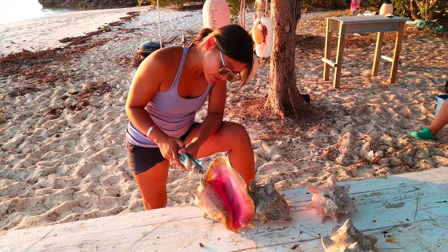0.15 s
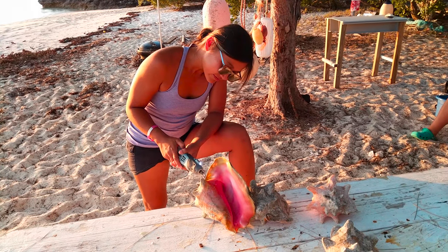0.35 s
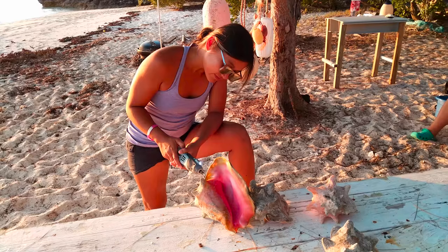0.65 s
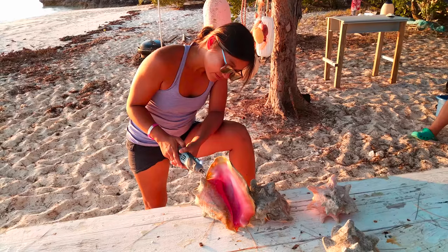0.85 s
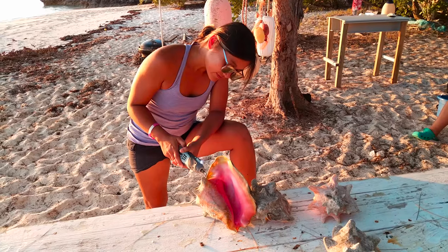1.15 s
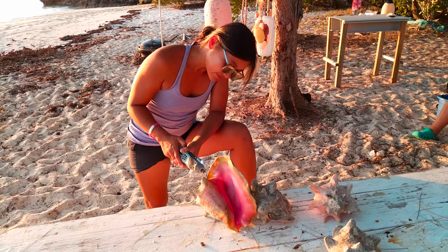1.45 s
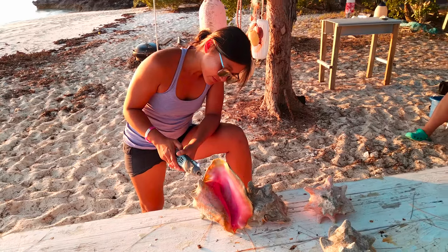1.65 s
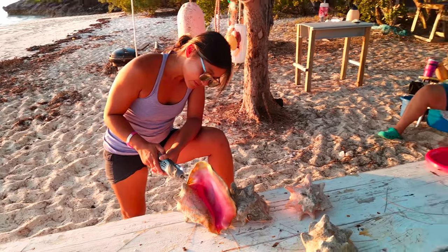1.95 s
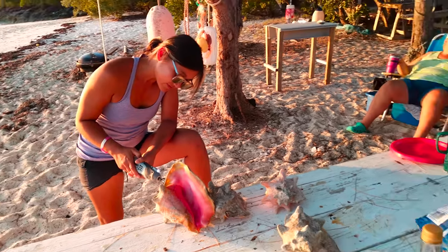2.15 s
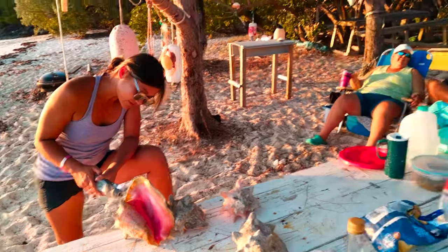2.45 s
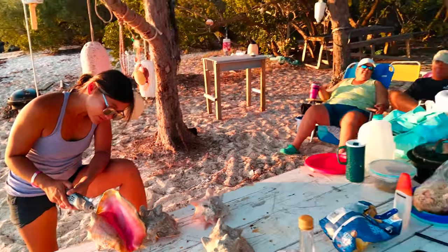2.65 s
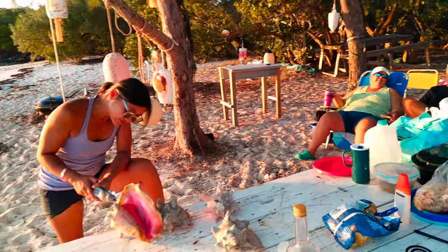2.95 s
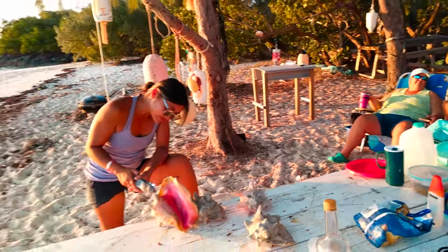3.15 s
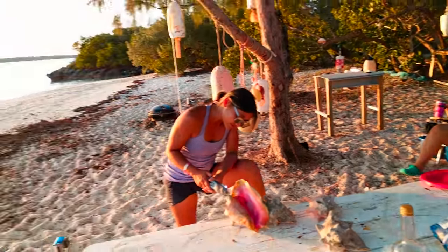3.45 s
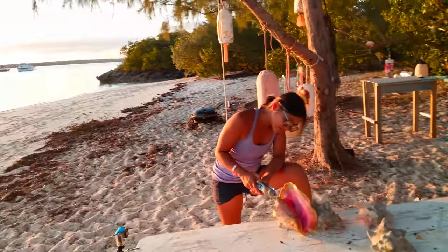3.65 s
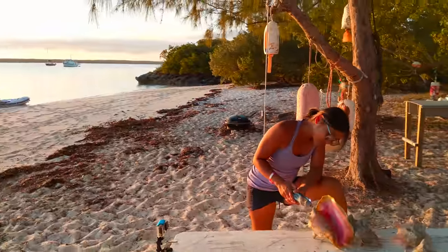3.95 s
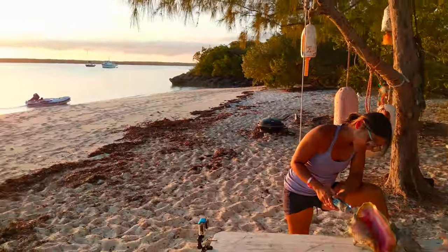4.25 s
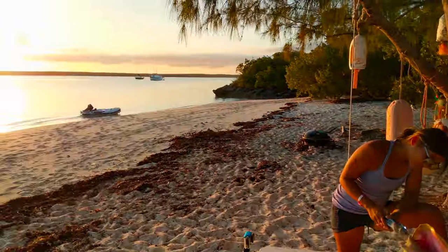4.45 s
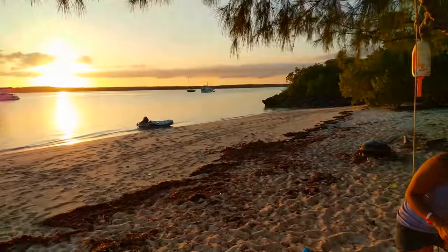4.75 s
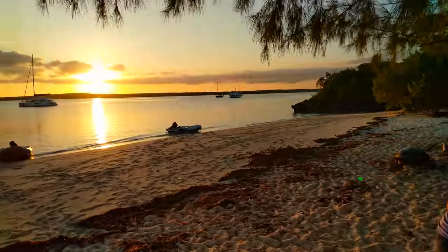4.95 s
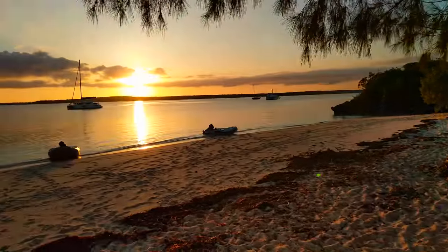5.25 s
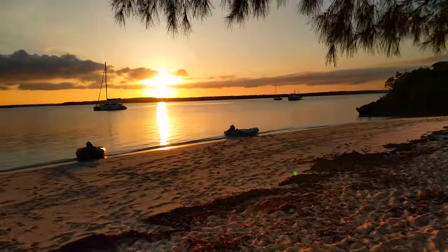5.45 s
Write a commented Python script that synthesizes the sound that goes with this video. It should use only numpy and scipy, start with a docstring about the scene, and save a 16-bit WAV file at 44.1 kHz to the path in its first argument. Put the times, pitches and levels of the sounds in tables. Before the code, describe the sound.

On a calm beach, a small rotary tool grinds a hard shell close to the microphone without a pause. A high motor whine mixes with hiss and rasp, and shrill squeals come and go as the bit bites. The shell flutters twice under the skipping bit. Later the pitch lifts slightly and the hiss changes colour as the microphone swings away, with a faint low rumble of breeze.

```python
"""A steady whine fades in close by: a handheld rotary tool, turning about 450 times a second, grinds a
conch shell on a table at a calm beach. The whine changes colour as the bit seats itself, skips or catches
and squeals; grit hisses, rasps once a turn and makes the shell ring. The microphone swings aside and
turns away, so the dips that a reflection cuts into the hiss slide upward. Light air rumbles below."""
import sys
import numpy as np
from scipy import signal
from scipy.io import wavfile
from scipy.ndimage import map_coordinates

SR = 44100
rng = np.random.default_rng(int(sys.argv[2]) if len(sys.argv) > 2 else 0)


def inscribe(sig):
    """Save sig as 16-bit PCM at rate SR to the path in sys.argv[1].

    A 1-D sig is mono; a 2-D sig holds one channel per row.
    Samples are clipped to [-1, 1] before scaling.
    """
    pcm = np.round(np.clip(np.atleast_2d(sig).T, -1, 1) * 32767)
    wavfile.write(sys.argv[1], SR, pcm.astype(np.int16))


N = 247665
TIME = np.arange(N) / SR

# spindle speed: (time [s], speed [turns/s])
SPINDLE_SPEED = [(0.0, 451.66), (0.5, 450.29), (0.72, 453.01), (0.88, 452.93), (1.07, 450.95),
                 (1.3, 450.34), (1.63, 447.4), (1.97, 451.31), (2.6, 450.56), (3.2, 449.12), (3.52, 452.15),
                 (3.78, 458.57), (4.05, 462.35), (4.17, 460.46), (4.45, 461.31), (4.7, 464.59),
                 (4.95, 462.16), (5.62, 462.68)]
# the bit sits in the cut; otherwise it skips: (start [s], end [s], firmness [0-1])
BIT_SEATS = [(0.518, .93, 0.95), (1.613, 2.963, 0.85), (3.544, 4.12, 0.7), (4.147, 5.7, 0.97)]
# the microphone's path: (time [s], to the side [0-1], turned away [0-1], reflection strength [factor],
# first dip [Hz], second dip [Hz], third dip [Hz])
MIC_PATH = [(0, 0.03, 0.04, 1.05, 3090, 7370, 11200), (1.9, 0, 0, 0.8, 3160, 7200, 11300),
            (2.45, 0.8, 0.1, 0.9, 3070, 6400, 10800), (2.95, 1, 0.2, 1.15, 2940, 6530, 11200),
            (3.3, 0.65, .2, 0.97, 3220, 7100, 11700), (3.55, 0.43, 0.5, 1.8, 3600, 7840, 11500),
            (3.78, 0.4, 0.38, 1.24, 3950, 9100, 13400), (4.2, 0.2, 0.44, 0.83, 4220, 8700, 14800),
            (4.7, 0.28, 0.8, 1, 4130, 9400, 17000), (5.05, 0.04, 0.8, 0.62, 4160, 12500, 18000),
            (5.62, 0.15, 1, 0.57, 4260, 14200, 18000)]
# dips cut by a reflection of strength 1: (half width [share of centre], depth [dB])
REFLECTION_DIPS = [(0.11, -11.5), (0.11, -5.5), (0.1, -4.5)]
# tones of bit and motor: (multiple [x speed], roughness [0-1], then five levels: skipping [dB],
# seated [dB], side change skipping [dB], side change seated [dB], change turned away [dB])
WHINE_TONES = [(2, .09, -48.5, -41.3, -14.5, -2.5, 1), (3, 0.14, -45, -53.5, -3, 12.5, -4.5),
               (4, 0, -42.5, -43.5, 0.5, -4.5, -6), (5, 0, -59.5, -44, -7, -2, -5),
               (6, 0.08, -45.5, -44.5, -9.5, -10, 0.5), (12, 0.17, -48, -42, -2.5, 1.5, -5)]
# the grinding noises, each with the same five levels [dB]
HISS_LEVELS = (-39, -39.5, -0.5, -0.05, -1.95)
LOW_RASP_LEVELS = (-54, -58, 1.5, 7, -2.5)
HIGH_RASP_LEVELS = (-47, -48, -6.5, -4, -13)
SHELL_LEVELS = (-43, -43, 3, 2, -30)
# resonances under the bit: (centre [Hz], width of each filter pass [Hz], trim [dB])
LOW_RASP_MODE, HIGH_RASP_MODE, SHELL_MODE = (732, 360, 0), (1870, 1050, 1.33), (4980, 380, -2.5)
# the shell's own notch, heard from the front: (centre [Hz], half width [Hz], depth [dB])
SHELL_NOTCH = (5530, 57, -4)
# upper harmonics, microphone in front and turned away: (frequency [Hz], level [dB])
OVERTONES_ON_AXIS = [(3150, -60.5), (4050, -56.5), (5000, -58.5), (6300, -57.5), (7400, -53.5), (8500, -64),
                     (10400, -58), (12500, -56.5), (14000, -56)]
OVERTONES_OFF_AXIS = [(3200, -70), (3700, -48.5), (4200, -51), (5100, -50.5), (6300, -56), (7400, -54),
                      (9500, -62.5), (11300, -58.5), (14000, -58)]
# tones between the harmonics: (multiple [x speed], seated [dB], skipping [dB], change turned away [dB])
RATTLE_TONES = [(.5, -85, -70, -13), (1.133, -57, -67, -16), (1.495, -61, -55, -10), (2.495, -88, -64, -3),
                (3.556, -55.5, -54.5, -1), (4.13, -57, -56, -13), (4.52, -53, -58, -18)]
# hiss of grit and cooling air, in front and turned away: (frequency [Hz], relative level [dB])
HISS_ON_AXIS = [(120, -18), (330, -14), (480, -9), (720, -7.5), (1150, -2), (2600, -0.5), (3600, -4),
                (4600, 1.5), (5700, -1), (8300, -3.5), (9800, -1.5), (11800, -1), (13500, 2), (14300, 2)]
HISS_OFF_AXIS = [(120, -13), (330, -10.5), (480, -12), (720, -4), (1150, -5.5), (1950, -4.5), (2550, 4.5),
                 (3500, 0.5), (5200, 1.5), (7400, 0.5), (9000, -0.5), (10400, -0.5), (12200, -1),
                 (13500, 4.5), (14300, -8)]
# hum of the unbalanced spindle: (time [s], level before trim [dB])
SPINDLE_HUM = [(0.0, -79), (0.03, -66), (0.36, -55), (2.24, -52), (2.8, -49), (3.69, -65.5), (3.79, -58),
               (5.4, -53.5), (5.62, -55)]
# gusts on the microphone: (time [s], level [dB])
MIC_GUSTS = [(2.3, -71), (2.53, -63), (3.06, -69), (4.15, -55), (4.32, -66), (5.22, -63.5), (5.47, -64)]
# the bit catches and sings: (start [s], end [s], multiple [x speed], level [dB])
BIT_SQUEALS = [(.15, .63, 31, -46), (0.878, 1.32, 22, -47.5), (1.03, 1.82, 31, -49), (1.64, 1.924, 22, -45),
               (1.95, 2.32, 30, -50), (2.34, 2.95, 30, -47), (2.42, 2.63, 29, -43),
               (2.462, 2.724, 23, -48.5), (3.172, 3.46, 31, -49), (3.42, 3.75, 21, -51.5),
               (3.472, 3.702, 23, -49.5), (3.757, 4.033, 22, -45), (3.993, 4.17, 23, -42),
               (4.3, 4.42, 26, -41), (4.38, 4.913, 29, -44), (4.818, 5.7, 23, -49), (5.065, 5.7, 18, -46),
               (5.104, 5.55, 27, -49.5), (5.3, 5.7, 21, -50)]
# the skipping bit makes the shell chatter: (start [s], end [s], level [dB])
SHELL_CHATTERS = [(1.13, 1.6, -44), (3.03, 3.27, -48)]


def from_db(db):
    """Decibels to gain."""
    return np.exp(np.asarray(db) * (np.log(10) / 20))


def rms_one(x):
    """Scale to rms 1."""
    return x / np.sqrt(np.mean(x ** 2) + 1e-20)


def in_time(rows, times=TIME):
    """Each column of a curve table at the given times."""
    row_times, *columns = np.transpose(rows)
    return [np.interp(times, row_times, column) for column in columns]


def at_hz(points, hz):
    """Read a spectrum on a log-frequency axis."""
    point_hz, level_db = np.transpose(points)
    return np.interp(np.log(np.maximum(hz, 1)), np.log(point_hz), level_db)


def bell_db(hz, centre_hz, width_hz, height_db):
    """A rounded peak or notch."""
    return height_db * np.exp(-((hz - centre_hz) / width_hz) ** 2)


def held(times, start, end, edge_s):
    """An envelope held from start to end with rounded edges, 0-1."""
    inside_s = np.minimum(times - start, end - times)
    return np.sin(np.pi / 2 * np.clip(inside_s / edge_s + .5, 0, 1)) ** 2


def drift(rate_hz, size=N, step=40, run_in=2000):
    """Smooth random motion of spread 1, drawn every few samples and joined by straight lines."""
    pole = np.exp(-2 * np.pi * rate_hz * step / SR)
    noise = rng.standard_normal(N // step + run_in + 2)
    slow = rms_one(signal.lfilter([1], [1, -2 * pole, pole ** 2], noise)[run_in:])
    return np.interp(np.arange(size) / step, np.arange(len(slow)), slow)


def resonate(x, hz, width_hz):
    """One resonance; rms 1."""
    radius = np.exp(-np.pi * width_hz / SR)
    feedback = [1, -2 * radius * np.cos(2 * np.pi * hz / SR), radius ** 2]
    return rms_one(signal.lfilter([1, 0, -1], feedback, x))


def noise_band(low_hz, high_hz):
    """Noise between two edges; rms 1."""
    band = signal.butter(2, [low_hz, high_hz], "band", fs=SR, output="sos")
    return rms_one(signal.sosfilt(band, rng.standard_normal(N)))


def partial(angle, multiple, rough, flutter_hz=45):
    """A tone at a multiple of the spindle speed, rms near 1, that flutters in level and phase."""
    phase = multiple * angle + rng.uniform(0, 2 * np.pi) + rough * drift(flutter_hz, len(angle))
    return np.sqrt(2) * (1 + rough * drift(flutter_hz, len(angle))) * np.cos(phase)


def spindle(wobble=0.00038):
    """Angle of the shaft; the uneven load shakes its speed a little."""
    speed, = in_time(SPINDLE_SPEED)
    return 2 * np.pi * np.cumsum(speed * (1 + wobble * drift(21))) / SR


def fade_in(fade_s=0.29, start_gain=0.18):
    """The sound of the already running tool fades in evenly, 0-1."""
    return np.minimum(start_gain + (1 - start_gain) * TIME / fade_s, 1)


def seating(settle_s=0.1, slip_s=0.04):
    """How firmly the bit sits in the cut, 0-1; it settles in more slowly than it slips out."""
    seated = np.zeros(N)
    for start, end, firmness in BIT_SEATS:
        settled = np.clip((TIME - start) / settle_s + .5, 0, 1)
        holding = np.clip((end - TIME) / slip_s + .5, 0, 1)
        seated += firmness * settled * holding
    return np.clip(seated, 0, 1)


def gain_at_mic(levels, pose):
    """Gain where the microphone is: the seated and the skipping bit each radiate in their own way."""
    skipping_db, seated_db, side_skipping_db, side_seated_db, away_db = levels
    seated, side, away = pose
    firm_db = seated_db + side * side_seated_db
    loose_db = skipping_db + side * side_skipping_db
    return from_db(seated * firm_db + (1 - seated) * loose_db + away * away_db)


def spectrum_at_mic(on_axis, off_axis, hz, times):
    """A spectrum in dB at the turning microphone, with the reflection's sliding dips and crest."""
    _, away, reflection, *dips_hz = in_time(MIC_PATH, times)
    front_db = at_hz(on_axis, hz) + bell_db(hz, *SHELL_NOTCH)
    level_db = (1 - away) * front_db + away * at_hz(off_axis, hz)
    for centre_hz, (width, depth_db) in zip(dips_hz, REFLECTION_DIPS):
        level_db += bell_db(hz, centre_hz, width * centre_hz, reflection * depth_db)
    crest_hz = 1.38 * dips_hz[1]  # above the second dip the reflection adds up
    return level_db + bell_db(hz, crest_hz, width_hz=0.057 * crest_hz, height_db=4)


def whine(angle, pose, waver_db=0.65, waver_hz=4):
    """The strong low harmonics of bit and motor; each wavers a little in the hand."""
    out = np.zeros(N)
    for multiple, rough, *levels in WHINE_TONES:
        gain = gain_at_mic(levels, pose) * from_db(waver_db * drift(waver_hz))
        out += gain * partial(angle, multiple, rough)
    return out


def overtones(angle, wander_db=3.0, rough=0.33):
    """Weak upper harmonics of the spindle that come and go."""
    times = np.linspace(0, TIME[-1], 200)
    speed, = in_time(SPINDLE_SPEED, times)
    out = np.zeros(N)
    for multiple in range(7, 31):
        if multiple == 12:  # this one belongs to the motor's whine
            continue
        level_db = spectrum_at_mic(OVERTONES_ON_AXIS, OVERTONES_OFF_AXIS, multiple * speed, times)
        wander = np.interp(times, TIME, drift(1.3))
        level_db += wander_db * np.minimum(wander - .5, 1)
        tone = np.sqrt(2) * np.cos(multiple * angle + rng.uniform(0, 2 * np.pi))
        flutter = 1 + rough * drift(35)
        out += np.interp(TIME, times, from_db(level_db)) * flutter * tone
    return out


def rattle(angle, pose):
    """A seated bit gives side tones; one that skips every other turn gives half harmonics."""
    seated, _, away = pose
    out = np.zeros(N)
    for multiple, seated_db, skipping_db, away_db in RATTLE_TONES:
        level_db = seated * seated_db + (1 - seated) * skipping_db + away * away_db
        out += from_db(level_db) * partial(angle, multiple, rough=0.41, flutter_hz=15.4)
    return out


def grit(angle, throb, grain_db):
    """Countless tiny fractures of uneven size, bunched once and twice a turn."""
    bunching = np.exp(throb * (np.cos(angle) + 0.69 * np.cos(2 * angle)))
    return rms_one(rng.standard_normal(N) * bunching * from_db(grain_db * drift(250)))


def shell_ripple(hz, times, spacing_hz=170, life_s=1.05):
    """Many weak shell resonances, each stirred more or less as the bit creeps along; spread about 1."""
    field = rng.standard_normal((256, 64))
    positions = np.broadcast_arrays(hz / spacing_hz, times / life_s)
    return map_coordinates(field, positions, order=3, mode="mirror")


def hiss(angle, frame_size=1024, ripple_db=0.35):
    """Broad grinding hiss, coloured by the shell and the reflection; its treble has rms near 1."""
    hz, times, frames = signal.stft(grit(angle, throb=0.1, grain_db=0.8), SR, nperseg=frame_size)
    hz = hz[:, None]
    level_db = spectrum_at_mic(HISS_ON_AXIS, HISS_OFF_AXIS, hz, times)
    gain = from_db(level_db + ripple_db * shell_ripple(hz, times))
    treble = (hz > 5700) & (hz < 14000)
    gain /= np.sqrt(np.mean(gain ** 2 * treble))
    return signal.istft(frames * gain, SR, nperseg=frame_size)[1][:N]


def ringing(angle, mode, throb):
    """Grit drives a resonance under the bit; two filter passes give it steep skirts."""
    hz, width_hz, trim_db = mode
    first_pass = resonate(grit(angle, throb, grain_db=-1.0), hz, width_hz)
    return from_db(trim_db) * resonate(first_pass, hz, width_hz)


def hum(angle, trim_db=-0.2):
    """The unbalanced spindle shakes the tool once a turn."""
    level_db, = in_time(SPINDLE_HUM)
    return from_db(level_db + trim_db) * partial(angle, multiple=1, rough=0.063)


def breeze(away, steady_db=-66, rise_db=7, gust_s=0.045):
    """Air rumbles on the microphone, with short gusts; it rises as the microphone faces the water."""
    steady = from_db(steady_db + rise_db * away)
    gusts = sum(from_db(level_db) * np.exp(-((TIME - time) / gust_s) ** 2)
                for time, level_db in MIC_GUSTS)
    return (steady + gusts) * noise_band(low_hz=44, high_hz=87.4)


def rumble(level_db=-59):
    """A dull opening rumble that dies away during the fade-in."""
    return from_db(level_db) * np.sqrt(1 - fade_in()) * noise_band(low_hz=140, high_hz=285)


def squeals(angle, edge_s=.13, rough=0.22, waver_db=2.2, neighbour_db=-11):
    """A harmonic swells while the bit catches and lifts its two neighbours a little."""
    out = np.zeros(N)
    for start, end, multiple, level_db in BIT_SQUEALS:
        on = (TIME > start - edge_s) & (TIME < end + edge_s)
        gain = held(TIME[on], start, end, edge_s) * from_db(level_db + waver_db * drift(7, on.sum()))
        for step in (-1, 0, 1):
            tone = partial(angle[on], multiple + step, rough)
            out[on] += gain * from_db(abs(step) * neighbour_db) * tone
    return out


def chatter(edge_s=.08):
    """Uneven kicks of the skipping bit keep the shell's main resonance ringing, so that it flutters."""
    gain = sum(from_db(level_db) * held(TIME, start, end, edge_s)
               for start, end, level_db in SHELL_CHATTERS)
    first_pass = resonate(rng.standard_normal(N), SHELL_MODE[0], width_hz=90)
    return gain * resonate(first_pass, SHELL_MODE[0], width_hz=180)


def scene():
    """Tool and shell close to the microphone, dead centre, in open air."""
    angle = spindle()
    side, away = in_time(MIC_PATH)[:2]
    pose = seating(), side, away
    tones = whine(angle, pose) + squeals(angle) + overtones(angle) + rattle(angle, pose)
    grinding = gain_at_mic(HISS_LEVELS, pose) * hiss(angle)
    grinding += gain_at_mic(LOW_RASP_LEVELS, pose) * ringing(angle, LOW_RASP_MODE, throb=0.086)
    grinding += gain_at_mic(HIGH_RASP_LEVELS, pose) * ringing(angle, HIGH_RASP_MODE, throb=0.2)
    grinding += gain_at_mic(SHELL_LEVELS, pose) * ringing(angle, SHELL_MODE, throb=0.24)
    tool = fade_in() * (tones + grinding + chatter()) + hum(angle)
    return np.tile(tool + breeze(away) + rumble(), (2, 1))


def record(dry, cutoff_hz=14260):
    """A steep low-pass takes off the top of the treble."""
    return signal.sosfilt(signal.ellip(16, .1, 90, cutoff_hz, fs=SR, output="sos"), dry)


dry = scene()
out = record(dry)
inscribe(out)
```